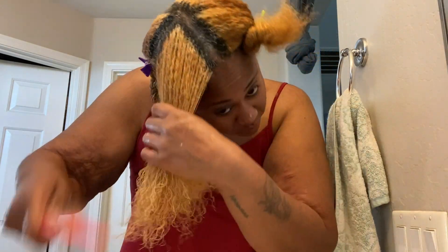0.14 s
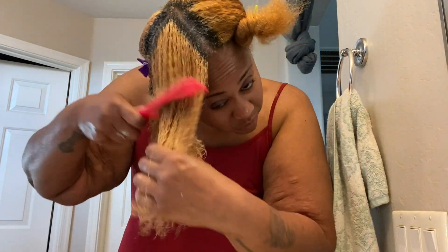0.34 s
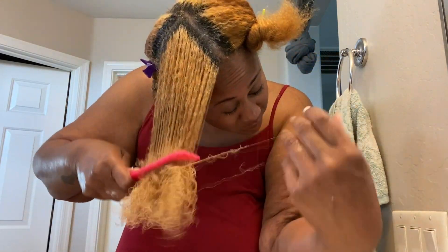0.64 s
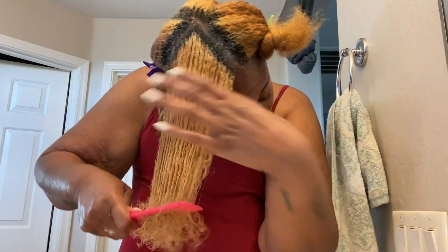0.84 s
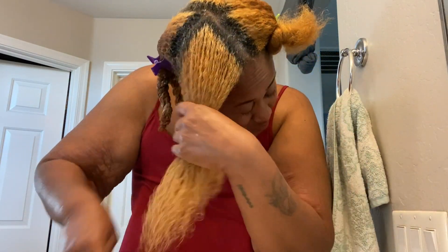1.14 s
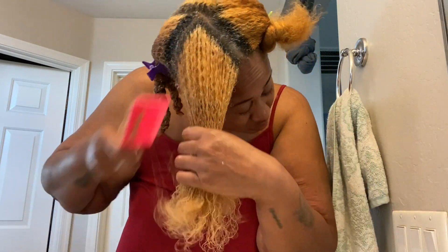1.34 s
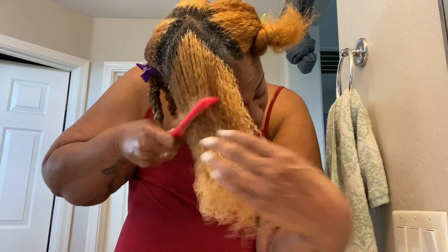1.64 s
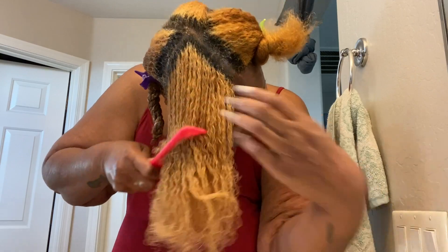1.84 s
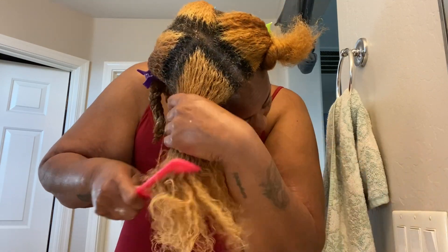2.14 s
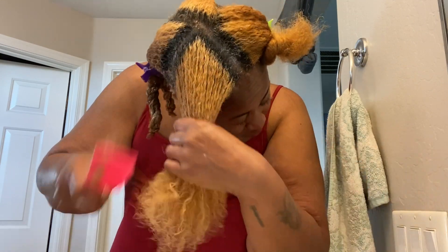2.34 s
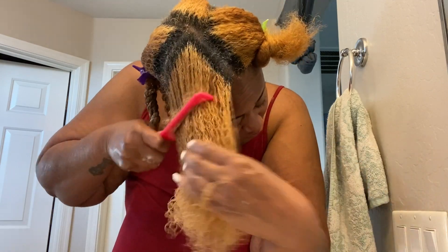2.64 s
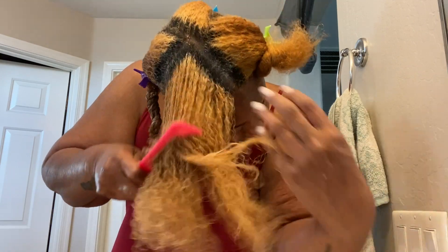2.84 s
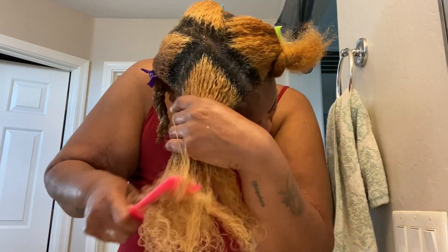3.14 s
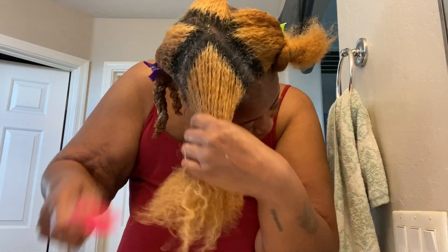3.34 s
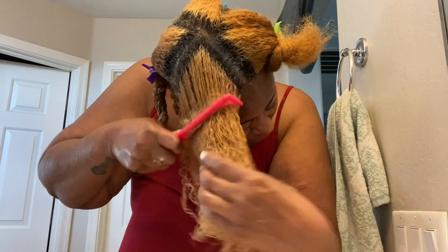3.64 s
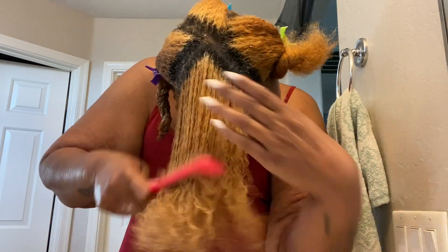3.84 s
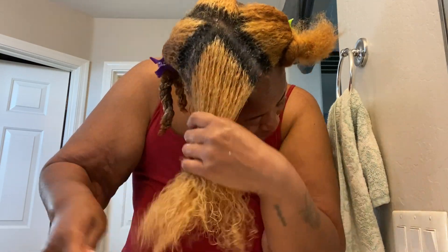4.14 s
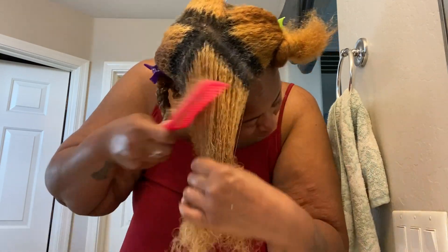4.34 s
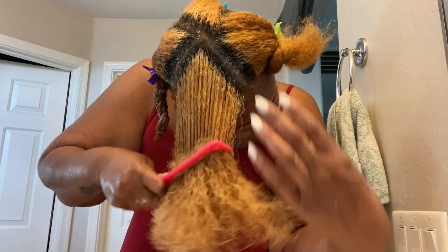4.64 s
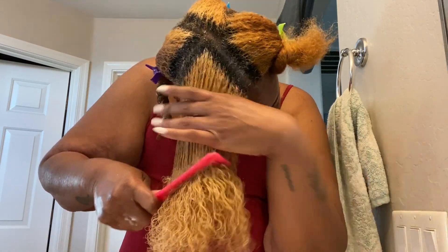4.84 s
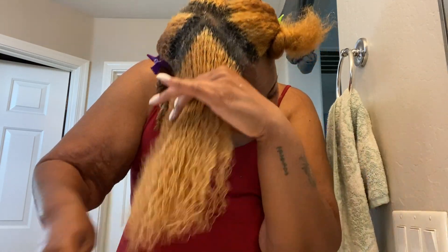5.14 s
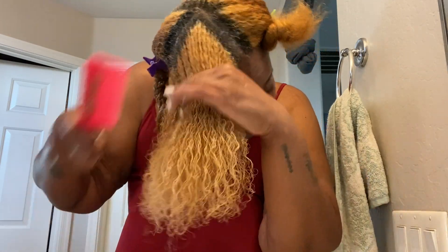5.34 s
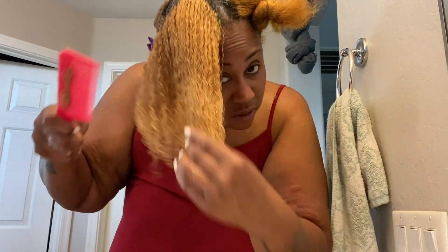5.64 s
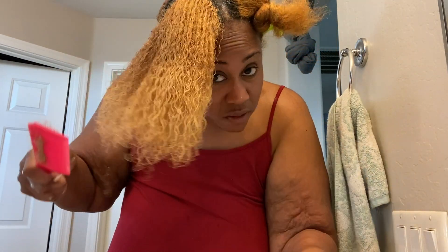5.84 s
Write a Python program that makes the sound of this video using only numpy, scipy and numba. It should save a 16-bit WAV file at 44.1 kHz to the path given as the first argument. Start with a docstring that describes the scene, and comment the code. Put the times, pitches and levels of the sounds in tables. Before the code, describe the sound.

A small, hard-walled bathroom heard by a phone about a metre away. A low, slightly wavering ventilation hum with soft rumble and faint hiss continues throughout. From about 0.25 s a plastic comb rakes dry hair: a bright raspy scratch, another at 0.6 s, a very brief one at 1.0 s. A new pass starts near 1.4 s, and a quieter rake swells from 1.65 s to a sharp snagging snap at 2.13 s. Strokes return at 2.4-3.2 s, with crackling tugs near 2.8 and 3.1 s. More short scrapes run from 3.45 to 4.0 s, with a crisp snap at 3.73 s, then from 4.3 s onward. The loudest burst, 4.8-5.05 s, is a rapid cluster of rough scratches, ticks and plastic tooth clicks. A faint hand rustle follows around 5.3 s, then a soft, airy swish of loose hair at 5.5-5.9 s, leaving the fan.

```python
"""A small bathroom: a plastic comb rakes through long hair in quick strokes, about a metre from a phone.
Strands slip over the teeth in dense tiny clicks (random pulses, filtered); the teeth ring (resonances).
Tangles tug in swelling flurries of clicks and single strands snap off as short noise bursts.
A hand smooths the lock, and at last it swings loose with a soft rustle of filtered clicks.
A ventilation fan hums (wavering sines) and rumbles (filtered noise) underneath."""
import sys
import numpy as np
from scipy import signal
from scipy.fft import rfft, irfft
from scipy.io import wavfile
from scipy.ndimage import uniform_filter1d
from numba import njit

SR = 44100
rng = np.random.default_rng(int(sys.argv[2]) if len(sys.argv) > 2 else 0)


def output_pcm(signal):
    """Save a mono or channel-first signal as 16-bit PCM at the path in sys.argv[1].

    Samples are clipped to [-1, 1] before scaling.
    """
    pcm = np.clip(np.atleast_2d(signal).T, -1, 1) * 32767
    wavfile.write(sys.argv[1], SR, np.round(pcm).astype(np.int16))


N = 264312
TIME = np.arange(N) / SR
FREQS = np.maximum(np.fft.rfftfreq(N, 1 / SR), 1)  # Hz, kept above zero for logs and divisions


def comb(rub_db=3.0, drag_db=-1, snag_drag_db=-5, snag_ring_db=-23, tooth_width_hz=580,
         tooth_wander=0.008, rasp_hz=4700, rasp_width_hz=2400, fizz_db=-9.0, fizz_per_drag=0.53,
         squeak_hz=5900, squeak_width_hz=2200):
    """Slipping strands scratch, ring the teeth and drag on the lock of hair."""
    # spectra of the hair's scratch, fizz and dull drag: pitch_hz [Hz], level_db [relative dB per Hz]
    scratch_spectrum = [(900, -6.5), (1400, -2.5), (1900, -7.5), (2600, -0.5), (4000, -2.5), (5100, 1.5),
                        (6500, -3), (8200, -2.5), (10000, -6), (12500, -4.5), (15500, -8.5)]
    fizz_spectrum = [(6500, -1), (9300, 5), (11800, 5), (13800, 5.5), (15500, -3)]
    drag_spectrum = [(150, -14), (330, 9.5), (650, 6), (1000, 6.5), (1400, -2.5), (2200, -6), (3500, -11.5)]

    rub, ring_db, bright_db = rakes()
    rub = rub * undb(rub_db)
    dull_db, rasp_db, weight_db = grip()
    sliding, rasping, dragging, fizzing, plucking = (
        rub * slips(per_s=10000, spread_db=1.0) for _ in range(5))
    snags, squeaks = (pull * slips(per_s=15000, spread_db=-15.0) for pull in tangles())

    squeak = tooth(squeaks, np.full(N, float(squeak_hz)), squeak_width_hz)
    scratch = colour(sliding + snags, scratch_spectrum)
    rasp_band = [(rasp_hz - rasp_width_hz, -12), (rasp_hz, 0), (rasp_hz + rasp_width_hz, -12)]
    rasp = colour(rasping * undb(rasp_db), rasp_band)
    drag_push = dragging * undb(dull_db + weight_db + drag_db) + snags * undb(snag_drag_db)
    drag = colour(drag_push, drag_spectrum)
    # where the hair gives little drag the comb skims, and fizzes more brightly
    fizz_gain = undb(fizz_db + bright_db - fizz_per_drag * dull_db)
    fizz = colour(fizzing * fizz_gain, fizz_spectrum)
    # the ring glides as the load on the teeth changes, with a small random wander
    push = plucking * undb(ring_db) + snags * undb(snag_ring_db)
    ring_hz = tooth_pitch() * (1 + tooth_wander * walk(24))
    ring = tooth(push, ring_hz, tooth_width_hz)
    return scratch + rasp + drag + fizz + squeak + ring


def rakes(attack_db_per_s=476, release_db_per_s=500):
    """How hard the teeth rub, and how much the strongest rake rings and fizzes."""
    # the arm draws the comb on in short rakes: start_s [s], length_s [s], level_db [dB, relative],
    # swell_db [dB over the rake], tooth_ring_db [dB, relative], fizz_db [dB, relative]
    rake_table = [ (0.257, 0.25, -72.5, -2.5, -10.5, 0.5), (0.596, 0.14, -73.5, -2, -6.5, -7),
                  (0.99, 0.047, -70.5, 1.5, -12, -10), (1.371, 0.092, -75.5, -0.5, -9, -5),
                  (1.485, 0.18, -82, 0.5, -18, 2.5), (1.655, 0.53, -80, 7.5, -10, 2),
                  (2.437, 0.064, -70.5, -5, -20, -6), (2.52, .08, -85, 5, -17, 4),
                  (2.601, 0.26, -76, 6, -11, 3), (3.017, 0.16, -69.5, -5, -17, 2),
                  (3.459, 0.061, -68.5, -4, -19, -3), (3.55, .08, -78, 0.5, -7, 2),
                  (3.64, 0.19, -71, 1.5, -3.5, 3), (3.883, 0.13, -72, 1.5, -8, 0),
                  (4.292, 0.22, -74, 1.5, -8.5, -0.5), (4.539, 0.084, -75, 2.5, -5.5, 1.5),
                  (4.658, 0.14, -82.5, 10.5, -6, 6), (4.809, 0.044, -63, -0.5, -3.5, -6),
                  (4.881, 0.034, -62, -7, -7, -4), (4.937, 0.11, -64, -3.5, -6.5, -4), ]

    level_db = np.full(N, -np.inf)
    ring_db, fizz_db = np.zeros((2, N))
    for start, length, db, swell_db, ring, fizz in rake_table:
        age = TIME - start
        fade_db = attack_db_per_s * np.maximum(-age, 0)
        fade_db = fade_db + release_db_per_s * np.maximum(age - length, 0)
        rake_db = db + swell_db * np.clip(age / length, 0, 1) - fade_db
        leads = rake_db > level_db
        level_db[leads], ring_db[leads], fizz_db[leads] = rake_db[leads], ring, fizz
    return undb(level_db), ring_db, fizz_db


def grip(root_drag_db=-29, end_drag_db=9, root_rasp_db=16.5, thicken_s=0.24):
    """Drag, rasp and weight in dB: a pass starts light and raspy at the taut roots, then drags more."""
    # passes begin with the comb set in at the roots: start_s [s],
    # rasp_db [dB, before the extra at the roots], drag_weight_db [dB, relative]
    pass_table = [(.18, -15.5, -5.5), (1.3, -13, -1.5), (2.36, -16, -2), (3.38, -16.5, -1.5),
                  (4.22, -17.5, -1.5)]

    starts, rasp_db, weight_db = np.transpose(pass_table)
    current = np.maximum(np.searchsorted(starts, TIME) - 1, 0)
    # the lock thickens towards its ends
    near_roots = np.exp(-np.maximum(TIME - starts[current], 0) / thicken_s)
    dull_db = end_drag_db + (root_drag_db - end_drag_db) * near_roots
    return dull_db, rasp_db[current] + root_rasp_db * near_roots, weight_db[current]


def tangles():
    """The pull on each tangle builds to a peak and dies away; also the part of it that squeaks."""
    # a tangle tightens and gives way in a flurry of slips: peak_s [s], level_db [dB, relative],
    # fade_s [s to fall to 37 % either side], squeak_db [dB against the pull]
    tug_table = [(2.138, -54, 0.011, -3.5), (2.795, -57, 0.032, -16), (2.838, -66, 0.014, -12),
                 (3.12, -55, 0.016, -9), (3.468, -68, 0.018, -14), (3.75, -56, 0.029, -16),
                 (3.98, -58.5, 0.0091, -10), (4.3, -62, 0.0068, -12)]

    return sum(np.outer(undb([db, db + squeak_db]), np.exp(-np.abs(TIME - s) / fade_s))
               for s, db, fade_s, squeak_db in tug_table)


def tooth_pitch():
    """Pitch in Hz at which the loaded teeth ring, gliding between set points."""
    # time_s [s], pitch_hz [Hz]
    pitch_table = [(.3, 2670), (1.0, 2750), (1.45, 2660), (2.2, 2650), (3.1, 2960), (3.8, 3180),
                   (4.03, 2800), (4.45, 2900), (4.62, 3200), (4.87, 3280), (4.97, 2980), (5.06, 2900)]
    return np.interp(TIME, *np.transpose(pitch_table))


def tooth(x, hz, width_hz):
    """The ring of a plastic tooth: a doubled resonance, scaled so white input keeps its power."""
    once = resonate(x, hz, float(width_hz))
    twice = resonate(once, hz, float(width_hz))
    return twice * np.sqrt(2 * SR / (np.pi * width_hz))


def strands(crackle_db=-11, ring_width_hz=700, counter_s=.0019, counter_db=-8.5):
    """Single strands catch and snap off the teeth: a few singly, the rest as a fine crackle."""
    # spectrum of the ticks: pitch_hz [Hz], level_db [relative dB per Hz]
    tick_spectrum = [(500, -5), (1000, 2.5), (2000, -8.5), (3200, -4), (6000, 2), (9000, 1), (15500, -3.5)]

    effort = rakes()[0] + tangles()[0]
    crackle = undb(crackle_db) * effort * slips(per_s=620, spread_db=4.5)
    ticks, flicks = snaps()
    out = colour(ticks + crackle, tick_spectrum) + tooth(flicks, tooth_pitch(), ring_width_hz)
    # the sound comes back once from the counter, sharply
    return out + undb(counter_db) * np.roll(out, int(counter_s * SR))


def snaps(tick_db=14):
    """A strand gives one sharp tick, then its neighbours settle; also the part that flicks a tooth."""
    # strands snap off a tooth, or the comb lands: start_s [s], level_db [dB, relative],
    # decay_s [s to fall to 37 %], tooth_ring_db [dB against the snap]
    snap_table = [(0.594, -74, .002, 3), (1.373, -60.5, 0.0013, -4), (1.673, -63.5, 0.0077, -27),
                  (2.128, -48, 0.0015, -23.5), (2.138, -48, .0012, -22), (2.771, -51.5, 0.0014, -14),
                  (3.022, -67, 0.0012, -15), (3.097, -54, .001, -12), (3.117, -50, .0012, -11),
                  (3.465, -60, .001, -21), (3.73, -48, .001, -18), (3.863, -62, 0.0011, -13),
                  (3.889, -58, 0.0045, -6), (3.9812, -57.5, 0.0013, 5), (4.291, -57, 0.003, -18),
                  (4.8124, -38.5, 0.0008, -28), (4.8245, -56, .0008, -12), (4.838, -54, .001, -6),
                  (4.8804, -47.5, 0.0016, 3), (4.885, -56.5, 0.0017, 3.5), (4.917, -60, .001, -20),
                  (4.9387, -47.5, 0.0013, -22), (4.945, -45, 0.0012, -11), (4.9543, -56, .0008, -16),
                  (4.986, -47, 0.0017, -4), (5.0103, -47, .001, -17), (5.033, -44.5, 0.0014, -20),
                  (5.168, -73, .003, -22)]

    out = np.zeros((2, N))
    for s, db, decay, ring_db in snap_table:
        age = np.arange(SR // 20) / SR
        burst = rng.standard_normal(len(age)) * np.exp(-age / decay)
        burst[0] = undb(tick_db)
        start = int(s * SR)
        out[:, start:start + len(age)] += np.outer(undb([db, db + ring_db]), burst)
    return out


def hand():
    """A palm gliding over hair gives a soft high rustle of tiny clicks."""
    # the free hand smooths down the lock: peak_s [s], level_db [dB, relative],
    # half_length_s [s, spread of the bell-shaped swell]
    smoothing_table = [(3.343, -86, 0.065), (4.222, -83.5, 0.052), (5.266, -79, 0.0099),
                       (5.332, -81, 0.027)]
    # spectrum of the rustle: pitch_hz [Hz], level_db [relative dB per Hz]
    palm_spectrum = [(5500, -5), (7200, 1), (8500, 7), (12500, 0), (15000, -13)]

    swell = sum(undb(db) * np.exp(-.5 * ((TIME - s) / half) ** 2) for s, db, half in smoothing_table)
    return swell * colour(slips(per_s=1400, spread_db=0.5), palm_spectrum)


def swing(rise_db_per_s=70, fall_db_per_s=260):
    """Loose strands brush over each other, swell as the lock falls and soon come to rest."""
    # the lock slides off the hand and swings free: start_s [s], length_s [s],
    # level_db [dB, relative], swell_db [dB over the length]
    swing_row = (5.53, .33, -82, 2.5)
    # spectrum of the loose hair's rustle: pitch_hz [Hz], level_db [relative dB per Hz]
    loose_spectrum = [(3200, -10), (4500, -8), (5600, -8), (6800, -0.5), (8300, 2), (9500, -1),
                      (11500, -5.5), (13400, -9), (15000, -26)]

    start, length, db, swell_db = swing_row
    age = TIME - start
    fade_db = rise_db_per_s * np.maximum(-age, 0) + fall_db_per_s * np.maximum(age - length, 0)
    level = undb(db + swell_db * np.clip(age / length, 0, 1) - fade_db)
    return level * colour(slips(per_s=9800, spread_db=-4.0), loose_spectrum)


def bathroom(x, direct_db=-8.0, near_db=-1.5, near_t60=0.018, wall_db=-3.5, wall_t60=0.21,
             pan_db=-1.0, count=8):
    """Short echoes off counter and nearest wall, longer ones off the room; their patterns shift."""
    # the sound is shared among several echo patterns, in slowly wandering amounts
    shares = np.array([walk(8) for _ in range(count)])
    shares = shares / np.linalg.norm(shares, axis=0)
    # before panning, the straight path is the same at both of the phone's ports
    out = undb(direct_db) * x
    for share in shares:
        echoes = undb(near_db) * reflections(near_t60) + undb(wall_db) * reflections(wall_t60)
        out = out + signal.fftconvolve((share * x)[None], echoes, axes=1)[:, :N]
    return out * pan(pan_db)


def reflections(t60):
    """Dense echoes falling 60 dB in t60 seconds, different at each port; energy 1."""
    t = TIME[:SR // 2]
    fading_noise = rng.standard_normal((2, len(t))) * np.exp(-np.log(1000) * t / t60)
    spectrum = rfft(fading_noise)
    # hard tiles and paint return every band alike
    spectrum = spectrum / np.sqrt(uniform_filter1d(np.abs(spectrum) ** 2, size=70, axis=1))
    train = irfft(spectrum, len(t)) * (t < t60)
    return train / np.linalg.norm(train, axis=1, keepdims=True)


def fan(air_db=-50.0, hiss_db=-78.7, waver_db=0.6, drift_rad=0.36, air_pan_db=-2.0, gust_db=0.64):
    """Shaft and mains tones waver over the rumble and hiss of moving air."""
    # spectra of the fan's rumble and hiss: pitch_hz [Hz], level_db [relative dB per Hz]
    air_spectrum = [(20, -20.5), (32, -16), (43, -2.5), (60, 3), (78, -2.5), (105, 1.5), (135, -5),
                    (165, -4), (180, -17), (300, -20.5), (430, -22.5), (520, -24.5), (780, -25),
                    (1100, -40)]
    hiss_spectrum = [(800, -14), (1200, 0), (1600, -3.5), (2200, -10), (3200, -16), (4200, -21),
                     (5600, -22.5), (8200, -23.5), (10000, -26), (12500, -30), (15000, -33)]
    # fan shaft, its harmonics and the mains: pitch_hz [Hz],
    # level_db [dB rms before waver and panning], left_minus_right_db [dB]
    hum_table = [(55.9, -53.5, 2), (112.7, -53.5, -2), (118.8, -62, -2), (168, -70, 1), (239.4, -74.5, -11),
                 (454, -81.5, 9.5)]
    # air resonating in the fan's housing: pitch_hz [Hz], width_hz [Hz], level_db [dB rms]
    housing_table = [(416.3, 38, -68.5), (585.4, 11, -74.5), (768.5, 24, -83), (1069, 26, -77),
                     (1481, 20, -89)]

    rumble = undb(air_db + gust_db * walk(3.56)) * diffuse(air_spectrum) * pan(air_pan_db)
    out = rumble + undb(hiss_db) * diffuse(hiss_spectrum)
    for hz, db, pan_db in hum_table:
        phase = 2 * np.pi * (hz * TIME + rng.random()) + drift_rad * walk(0.37)
        level = np.sqrt(2) * undb(db + waver_db * walk(6.0))  # root 2: rms to peak of a sine
        out = out + level * np.sin(phase) * pan(pan_db)
    for hz, width, db in housing_table:
        ports = rng.standard_normal((2, N))
        out = out + undb(db) * np.array([steady(port, hz, width) for port in ports])
    return out


def diffuse(points):
    """Room noise at two ports: much alike in the bass, largely unlike in the treble."""
    # how unlike the two ears the noise is: pitch_hz [Hz], side_minus_mid_db [dB]
    width_table = [(30, -22), (60, -33), (115, -18), (200, -1), (380, -7), (800, 0.5), (4000, 0.5),
                   (12000, 8)]

    mid, side = (colour(rng.standard_normal(N), points) for _ in range(2))
    side = irfft(rfft(side) * response(width_table), N)
    return np.array([mid + side, mid - side])


def steady(x, hz, width):
    """A fixed resonance; rms 1."""
    return unit(resonate(x, np.full(N, float(hz)), float(width)))


@njit
def resonate(x, hz, width):
    """Band-pass whose centre can move every sample, as a ringing body's pitch does."""
    y, band, low = np.empty(len(x)), 0., 0.
    for i in range(len(x)):
        g = np.tan(np.pi * hz[i] / SR)
        damping = width / hz[i]
        v = (band + g * (x[i] - low)) / (1 + g * (g + damping))
        band = 2 * v - band
        low = low + 2 * g * v
        y[i] = damping * v
    return y


def slips(per_s, spread_db):
    """Tiny clicks at random times, rms 1; spread above 0 makes a few strong, below 0 a few weak."""
    happen = rng.random(N) < per_s / SR
    size = undb(spread_db * np.minimum(rng.exponential(size=N), 4))
    return unit(happen * size * rng.standard_normal(N))


def walk(rate):
    """Smooth random wander of rms 1, mostly slower than rate in Hz."""
    return unit(irfft(rfft(rng.standard_normal(N)) / (1 + (FREQS / rate) ** 4), N))


def colour(x, points):
    """Shape x's spectrum, falling steeply beyond the end points; white input keeps its power."""
    low_skirt = 1 + (.8 * points[0][0] / FREQS) ** 8
    high_skirt = 1 + (.8 * FREQS / points[-1][0]) ** 12
    skirts = 1 / np.sqrt(low_skirt * high_skirt)
    return irfft(rfft(x) * unit(response(points) * skirts), N)


def response(points):
    """Gain at every frequency from (Hz, dB) points."""
    hz, db = np.transpose(points)
    return undb(np.interp(np.log(FREQS), np.log(hz), db))


def pan(db):
    """Left and right gains for a level difference."""
    return undb(np.array([[db], [-db]]) / 2)


def unit(x):
    """Scale to rms 1."""
    return x / np.sqrt(np.mean(x ** 2))


def undb(db):
    """Decibels to gain."""
    return 10 ** (np.asarray(db) / 20)


def scene():
    """Combing, smoothing and swinging hair in the room, over the fan."""
    hair = bathroom(comb() + hand() + swing(), count=6)
    # the snaps, on the outside of the lock, reach the phone more directly
    snapping = bathroom(strands(), direct_db=-5.5, near_db=-9, wall_db=-5.0, count=2)
    return hair + snapping + fan()


def record(dry, widen_hz=6400, leak_rad=0.14, port_lag_s=.00019, top_hz=15400):
    """The phone widens the treble, mixing in each other port late and inverted, and cuts the top."""
    left, right = rfft(dry)
    treble = 1 / (1 + (widen_hz / FREQS) ** 14)
    # travel time of sound between the phone's two ports
    late = np.exp(-2j * np.pi * FREQS * port_lag_s)
    # unequal mixing angles let the left port dominate the treble of both channels
    into_left = treble * leak_rad
    into_right = treble * (np.pi / 2 - leak_rad)
    wide_left = np.cos(into_left) * left - np.sin(into_left) * late * right
    wide_right = np.cos(into_right) * right - np.sin(into_right) * late * left
    wide = irfft(np.array([wide_left, wide_right]), N)
    top = signal.ellip(8, .2, 70, top_hz, fs=SR, output="sos")
    return signal.sosfilt(top, wide)


dry = scene()
out = record(dry)
output_pcm(out)
```